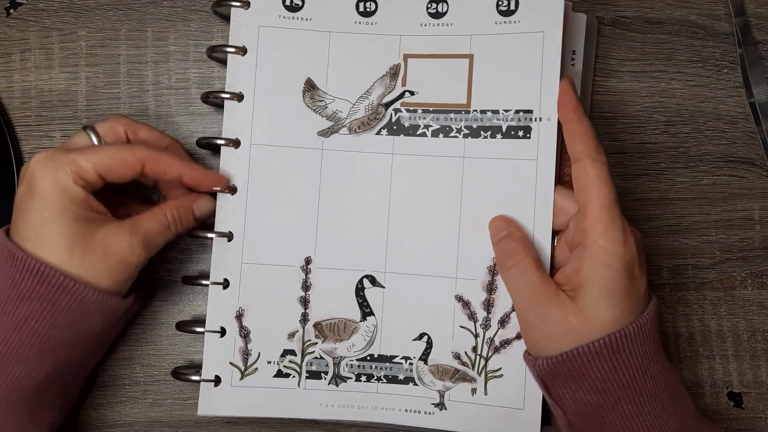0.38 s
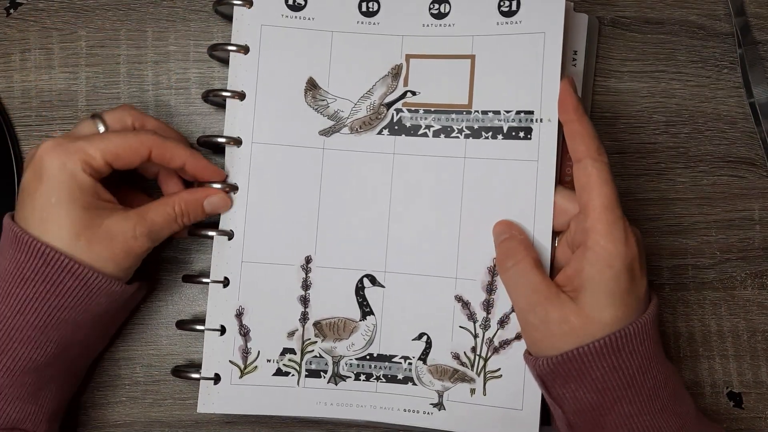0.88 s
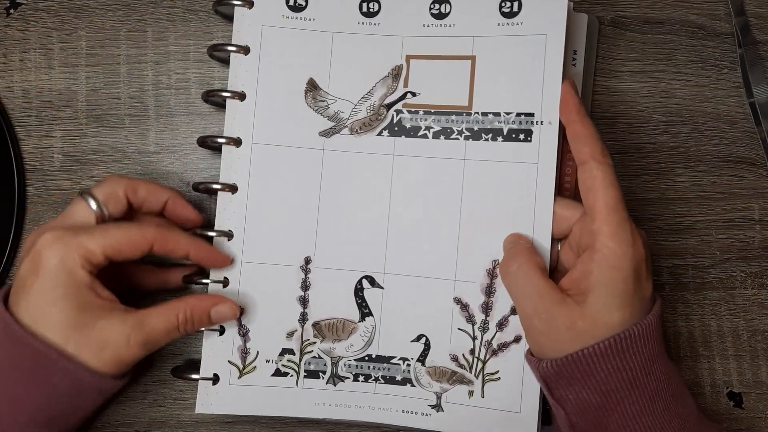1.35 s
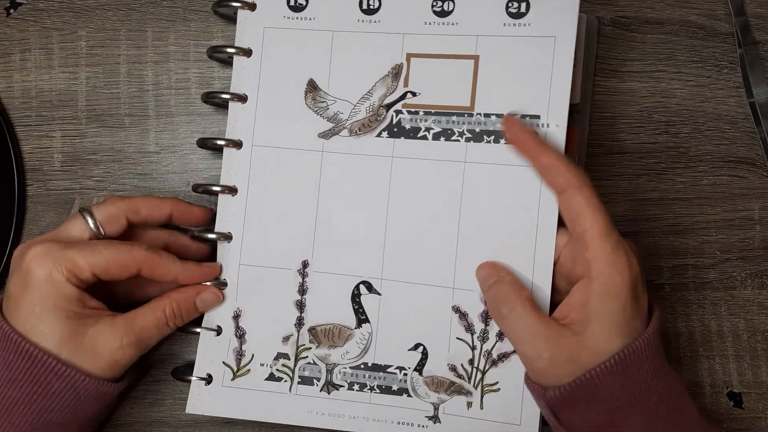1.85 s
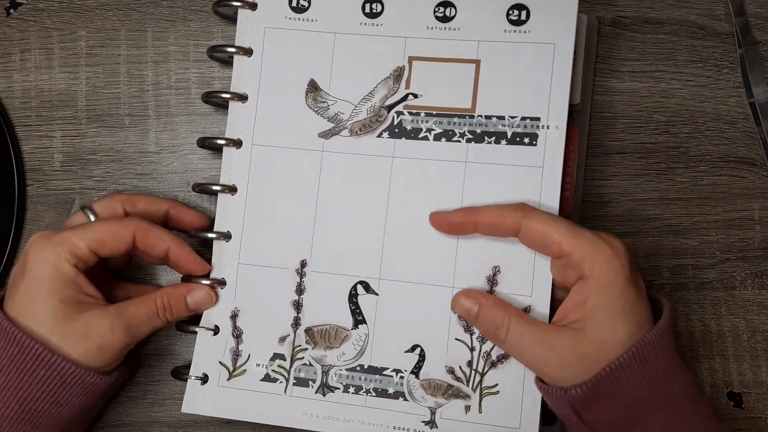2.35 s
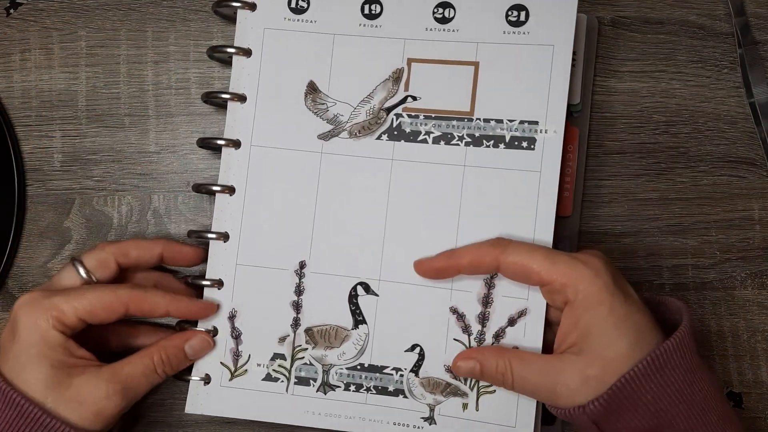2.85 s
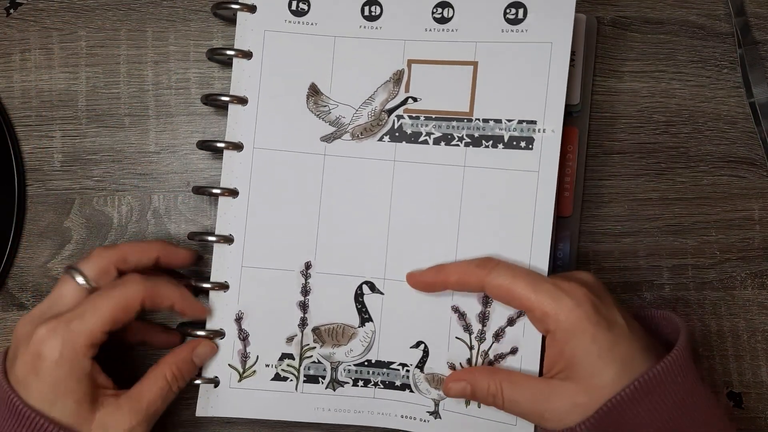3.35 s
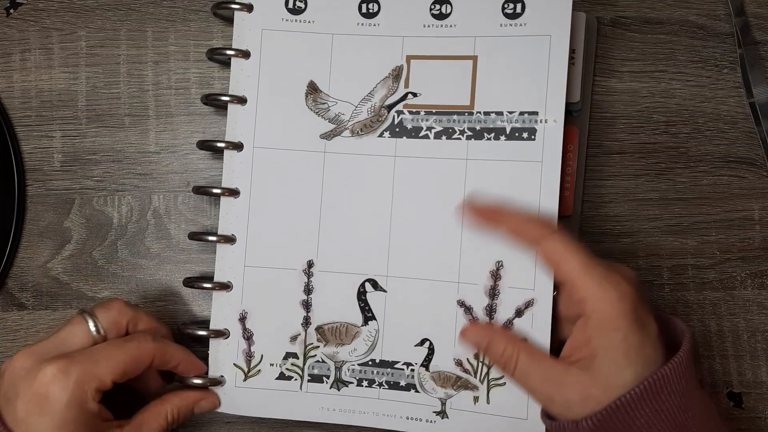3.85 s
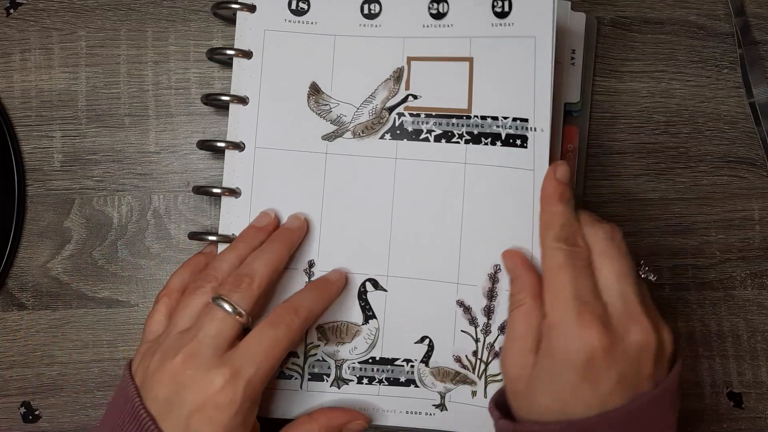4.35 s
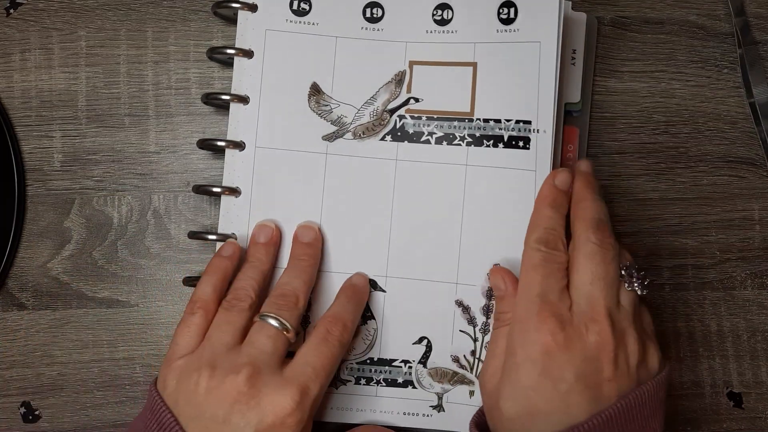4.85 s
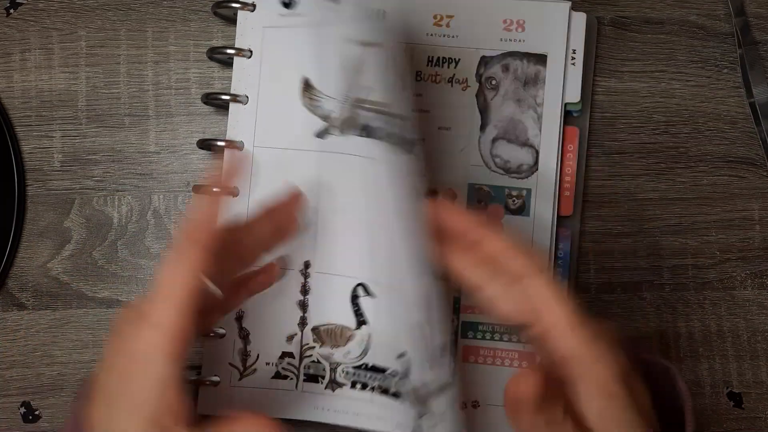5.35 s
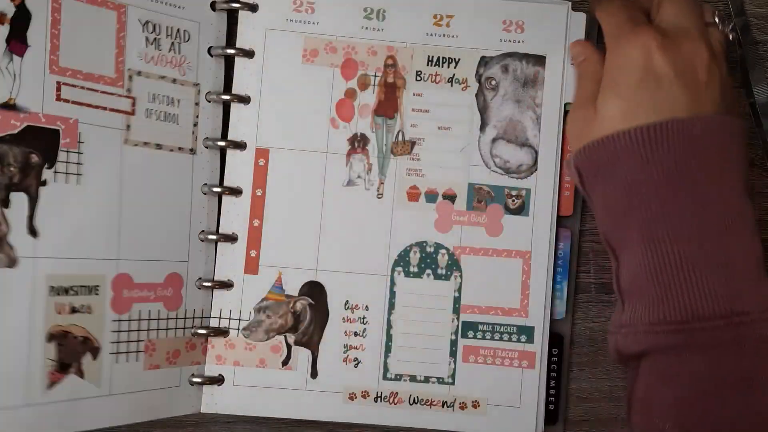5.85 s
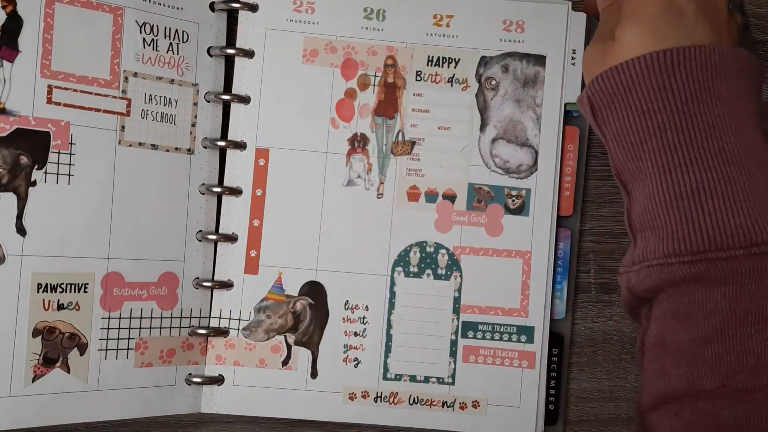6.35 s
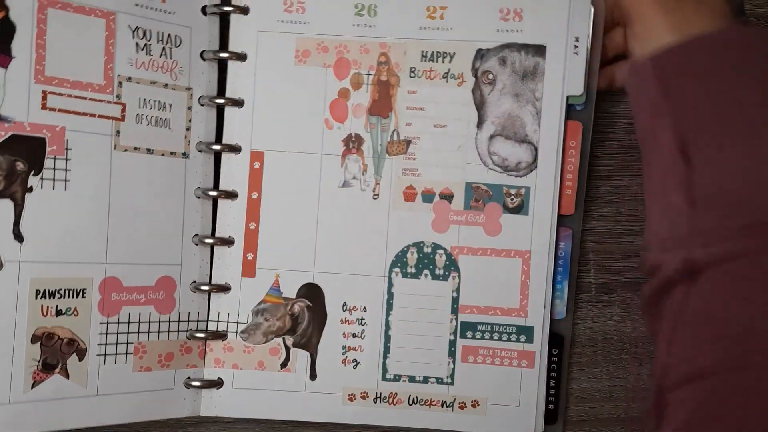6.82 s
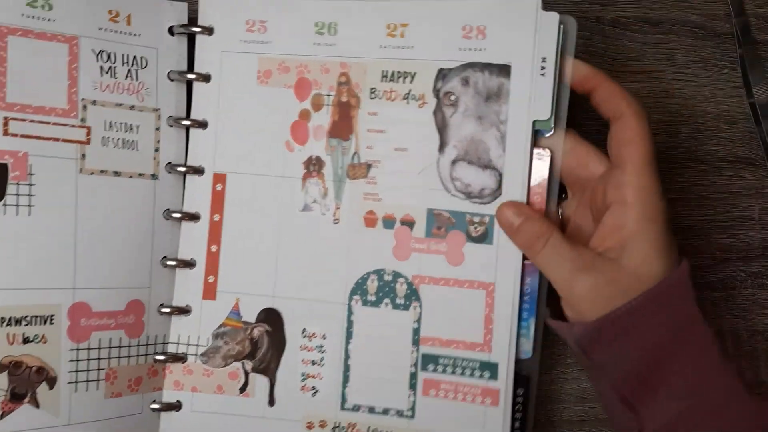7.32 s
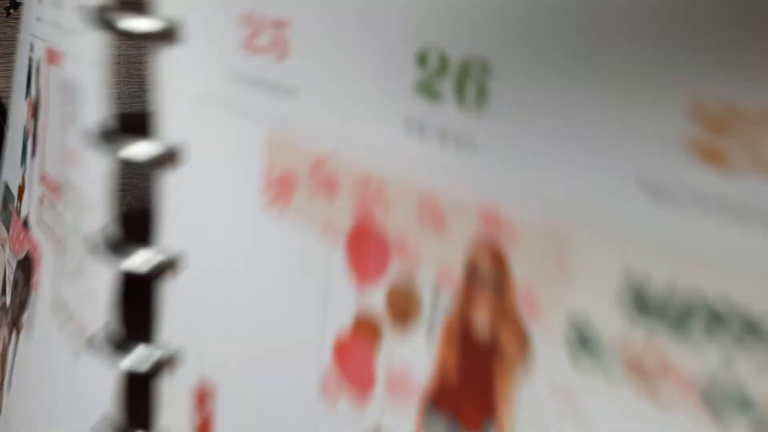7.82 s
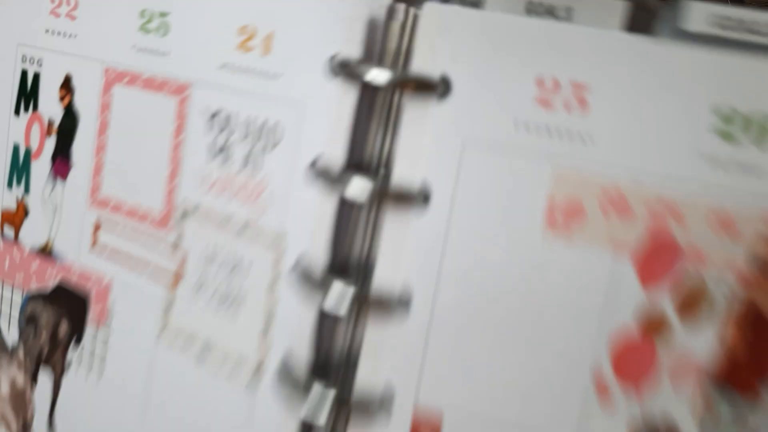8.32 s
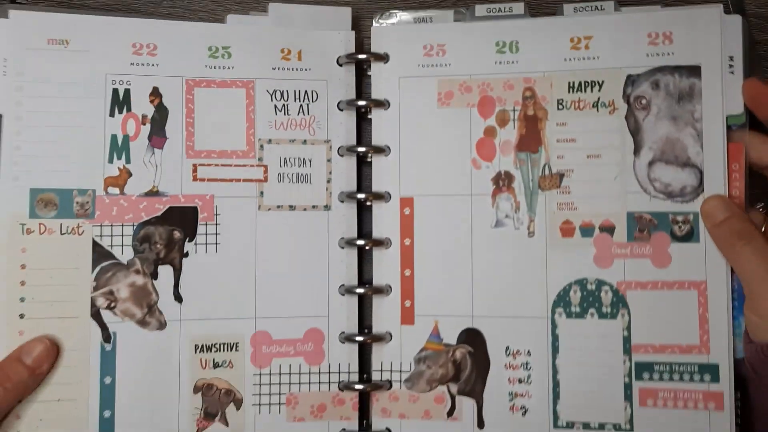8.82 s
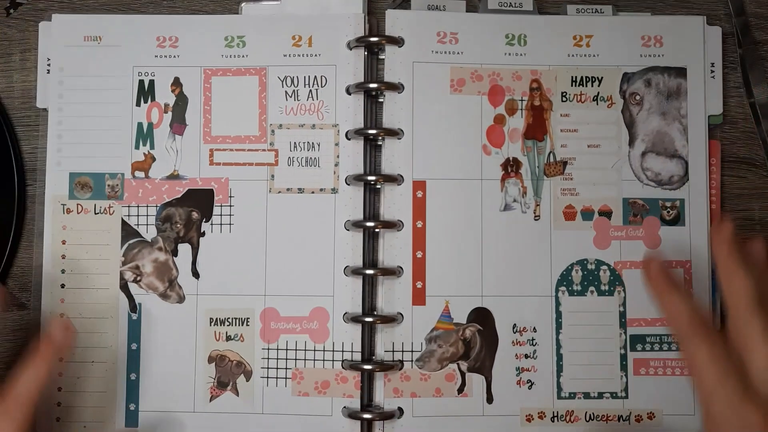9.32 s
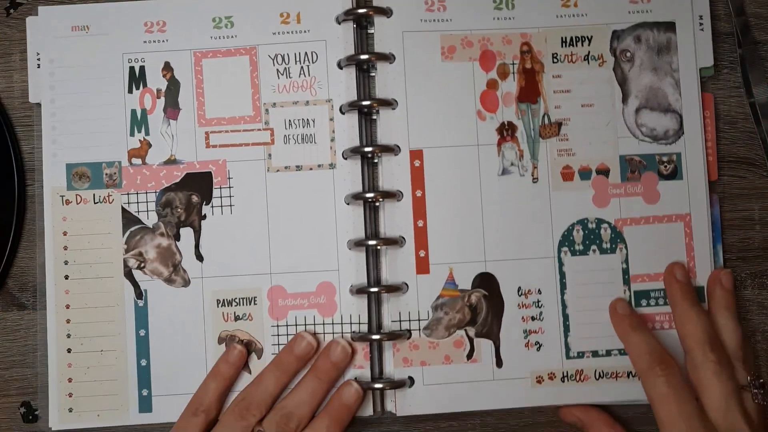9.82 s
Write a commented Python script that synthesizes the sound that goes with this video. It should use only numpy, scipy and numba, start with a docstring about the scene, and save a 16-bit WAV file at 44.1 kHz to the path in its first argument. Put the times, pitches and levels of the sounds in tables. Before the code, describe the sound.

A close microphone in a small room catches hands on a paper planner, over faint air hiss and unsteady low hum. At 0.15 s a papery knock and scuff, then small scrapes and faint finger rubs. Around 1.5 s a tight cluster of bright, hard clicks snaps out, the sharpest early sound. Sparse brushing and isolated ticks continue through 4 s; a tiny rising fingertip squeak comes at 4.25 s. Outside, an engine drones faintly, strongest near 5 s. At 5.1-5.3 s a page flips with a crisp swish, followed by soft bumps to 5.65 s. Near quiet until 6.5 s, then steady low rustling and clicking until 7.7 s. From 7.8 to 8.1 s lifting brings quick hard clacks and a barely audible fluttering whistle. At 8.5 s the book lands with the loudest thump and a low boom, shuffles, thuds again at 9.0 s, and a soft rub at 9.4 s fades to room tone.

```python
"""Handling a paper planner

Fingers work down the disc binding of a planner on a wooden desk; a page is flipped, the book is lifted and set down.
Rubbing skin and paper is grainy noise; clicks and knocks are fading bursts of ticks, and desk tones ring below.
Short scrapes swell and die, a fingertip squeaks once on sliding tones, and a faint whistle is a narrow fluttering band.
An engine drones by outside as a few low tones, over wavering house hum and steady air noise.
A small room answers the hands with fading noise echoes."""
import sys
import numpy as np
from scipy import signal
from scipy.fft import rfft, irfft
from scipy.io import wavfile
from scipy.ndimage import uniform_filter1d
from numba import njit

SR = 44100
rng = np.random.default_rng(int(sys.argv[2]) if len(sys.argv) > 2 else 0)


def log_audio(samples):
    """Write samples as a 16-bit WAV file to the path given in sys.argv[1]."""
    # one column per channel
    frames = np.atleast_2d(samples).T
    # limit to full scale, then quantise
    limited = np.clip(frames, -1, 1)
    pcm = np.round(limited * 32767).astype(np.int16)
    wavfile.write(sys.argv[1], SR, pcm)


def voltage_ratio(level):
    """Linear amplitude factor for a level in decibels (scalar or array-like)."""
    return 10 ** (np.asarray(level, float) / 20)


N = 438354
T = np.arange(N) / SR  # time in seconds
SIDES = np.array([[.5], [-.5]])  # left, right

# Colour of the room air and microphone hiss, relative levels: pitch_hz, level_db (per Hz)
AIR_COLOUR = [(25, -38.5), (45, -10), (75, -6.5), (170, -18.5), (300, -18.5), (450, -18.5), (700, -29.5),
              (1100, -29.5), (4000, -39), (9000, -39), (15700, -37.5)]
# Tones of the appliance hum, before they waver: pitch_hz, level_db
HUM_TONES = [(75.4, -75), (145.3, -74.5), (290.7, -86.5), (328.4, -84)]
# Engine outside, before the walls: time_s, firing_rate_hz, level_db
ENGINE_PATH = [(4.1, 48.98, -74.5), (5.06, 65.4, -61.5), (6.199, 68.9, -76.5)]
# What the house walls let through: pitch_hz, gain_db
WALL_GAIN = [(45, 0), (65, 6.5), (100, 0), (150, 5), (200, -3.5), (260, -20)]
# How long room echoes take to fade by 60 dB: pitch_hz, fade_s
ECHO_FADE = [(200, 0.22), (1000, 0.21), (4000, 0.21), (12000, 0.22)]
# Where the hands work: time_s, left_minus_right_db
HAND_PAN = [(0.0, -2.5), (1.96, -4.5), (9.94, -1)]
# Ringing tones of the desk under a knock, relative levels: pitch_hz, level_db, fade_s (to -60 dB)
DESK_TONES = [(130, -12.5, 0.09), (183, -12, .12), (319.6, 4, 0.061), (361, 0, 0.075), (442.5, -3, 0.11),
              (562, 2, 0.033), (751, -1.5, 0.032), (1024, -12, 0.022)]
# Booming tones of the desk top as a whole, relative levels: pitch_hz, level_db, fade_s (to -60 dB)
BOOM_TONES = [(64.3, -1, 0.38), (93, 7.5, 0.31), (116, -2, 0.49)]
# The whole book meets the desk: start_s, level_db, push_ms (from start to strongest push)
BOOK_LANDINGS = [(8.492, -46.5, 14), (8.982, -46.5, 13.4)]
# Colour of the paper body in a burst, relative levels: pitch_hz, level_db (per Hz)
BODY_COLOUR = [(400, -7.5), (900, -5), (2000, -5), (4200, -8), (5500, -16), (8000, -29.5)]
# Colour of rubbed paper, relative levels: pitch_hz, level_db (per Hz)
RUSTLE_COLOUR = [(400, -9), (900, -6.5), (1800, -6), (2600, -7.5), (4500, -9.5), (7000, -32)]
# Colour of the crisp top and the hiss, relative levels: pitch_hz, level_db (per Hz)
CRISP_COLOUR = [(2200, -17), (4600, -0.5), (6900, -1), (8600, -5), (12500, 0.5), (15700, -1)]
# Thin whistle while the book is lifted: time_s, pitch_hz, level_db
WHISTLE_PATH = [(8.14, 2150, -69), (8.3, 2130, -77), (8.41, 2110, -73.5), (8.46, 2100, -79)]
# Fingertip squeak, before it wavers: time_s, slip_rate_hz, level_db
SQUEAK_PATH = [(4.18, 330, -84), (4.225, 610, -67), (4.254, 820, -54), (4.275, 790, -66), (4.35, 760, -84)]
# Short scrapes: start_s, body_db, crisp_db (relative to body), pitch_hz (of body), length_ms
SCRAPE_EVENTS = [(0.2863, -54, -1, 2450, 36), (0.495, -59, -9, 2110, 20), (0.579, -47.5, 1.5, 2200, 27),
                 (1.466, -52.5, -15.5, 2040, 36), (1.871, -62, 3, 1160, 100), (2.478, -60, -2.5, 1740, 61),
                 (2.5074, -54, -4.5, 1730, 45), (3.1428, -54.5, 4, 4000, 34),
                 (5.1887, -41.5, 4.5, 2110, 21), (7.2514, -43.5, -5, 1150, 15.4),
                 (7.311, -50, -20, 1550, 30), (7.605, -59, 7, 3120, 30)]
# Strokes of skin and pages: full_strength_s, hold_s, rustle_db, hiss_db, pitch_hz (of rustle)
STROKE_EVENTS = [(0.0, 0.07, -82, -69, 2877), (0.115, 0.032, -76.5, -60.5, 1160),
                 (0.158, 0.022, -48, -47, 900), (0.18, .01, -63, -71, 1940),
                 (0.508, 0.044, -67, -63.5, 2135), (0.583, .11, -68.5, -63.5, 2390),
                 (0.755, 0.059, -86, -71.5, 1770), (0.876, 0.029, -76, -63, 1674),
                 (1.039, 0.11, -80, -68, 1717), (1.166, 0.05, -72.5, -61.5, 1706),
                 (1.287, 0.051, -76, -66, 1914), (1.455, 0.12, -68, -57.5, 1998),
                 (1.571, 0.031, -57.5, -55, 1870), (1.724, .1, -71, -67.5, 3444),
                 (1.874, 0.038, -62, -59.5, 1750), (1.968, 0.11, -71.5, -64.5, 1740),
                 (2.147, 0.15, -84.5, -74.5, 1444), (2.36, 0.098, -79.5, -67, 1435),
                 (2.483, 0.07, -68, -69.5, 1696), (2.594, 0.086, -74, -73.5, 1758),
                 (2.686, 0.046, -65, -62.5, 1130), (2.757, 0.08, -75.5, -67.5, 1640),
                 (2.912, 0.076, -73.5, -66.5, 1623), (3.028, 0.12, -64.5, -61, 1816),
                 (3.323, 0.04, -72, -62.5, 1580), (3.411, 0.045, -69, -68, 2953),
                 (3.524, 0.092, -74.5, -60, 1862), (3.602, 0.12, -81, -60.5, 1900),
                 (3.9, 0.11, -77, -63.5, 1970), (4.061, 0.0083, -66, -61, 1823),
                 (4.146, 0.026, -75, -65.5, 1780), (4.4, 0.025, -67.5, -68.5, 1408),
                 (4.79, 0.0051, -65.5, -67, 2019), (4.914, 0.0038, -75.5, -58.5, 2010),
                 (4.999, 0.032, -68.5, -59.5, 2527), (5.089, 0.023, -61, -57, 2580),
                 (5.144, 0.041, -54, -55, 1880), (5.186, 0.052, -47, -52.5, 1101),
                 (5.296, 0.041, -70, -71, 871), (5.38, 0.025, -71, -65.5, 1500),
                 (5.521, 0.03, -66.5, -62.5, 860), (5.627, .04, -66, -66, 915),
                 (5.735, 0.11, -86, -77.5, 2028), (6.548, 0.043, -72, -66, 988),
                 (6.584, 0.03, -62, -67.5, 1028), (6.651, 0.074, -70.5, -68, 942),
                 (6.751, 0.074, -61, -56.5, 900), (6.846, 0.099, -55.5, -55.5, 864),
                 (6.966, 0.086, -55, -56.5, 892), (7.082, 0.072, -56, -56, 800),
                 (7.197, 0.082, -55.5, -56, 1072), (7.298, 0.038, -58, -61, 800),
                 (7.395, 0.075, -60, -58.5, 1300), (7.489, 0.078, -59.5, -59, 1168),
                 (7.615, 0.045, -55.5, -54.5, 3144), (7.687, 0.16, -61.5, -63.5, 1912),
                 (7.772, 0.0075, -74, -53, 3000), (7.865, 0.06, -72, -65.5, 3357),
                 (7.958, 0.041, -61.5, -75, 2325), (8.071, 0.033, -64, -58, 996),
                 (8.159, 0.078, -70.5, -71.5, 2004), (8.293, .07, -66, -77, 800),
                 (8.506, 0.072, -38, -61, 3000), (8.601, 0.074, -52, -59, 1883),
                 (8.659, 0.068, -54.5, -68, 1500), (8.781, 0.076, -58, -72, 955),
                 (8.857, .02, -59, -67, 817), (8.881, 0.021, -48.5, -59.5, 988),
                 (8.929, 0.049, -42.5, -52.5, 1002), (9.001, 0.033, -41, -70, 872),
                 (9.161, 0.36, -75.5, -76, 848), (9.401, 0.026, -63.5, -70, 1395),
                 (9.433, 0.081, -55, -61, 1425), (9.564, 0.14, -69, -79.5, 1541)]
# The book flexes on the desk: full_strength_s, hold_s, level_db
FLEX_EVENTS = [(0.175, 0.015, -60), (4.388, 0.022, -66.5), (5.237, 0.023, -45.5), (5.521, 0.09, -56.5),
               (5.637, .02, -48.5), (6.545, .02, -72.5), (6.842, 0.01, -50), (6.982, 0.19, -64),
               (7.46, 0.18, -59), (7.62, 0.48, -70.5), (8.064, 0.067, -59.5), (8.293, 0.063, -69.5),
               (8.51, 0.0073, -36), (8.751, 0.18, -67), (8.859, 0.12, -56), (8.97, 0.03, -53),
               (9.417, 0.081, -53.5)]
# Discs and page edges click: start_s, body_db, crisp_db (relative to body), pitch_hz, fade_ms (to -20 dB)
CLICK_EVENTS = [(0.3144, -39, -7, 2200, 6.7), (0.6513, -53.5, -26, 2750, 12),
                (1.52, -30.5, -7.5, 1500, 5.6), (1.5247, -24.5, -8, 3530, 4.2),
                (1.5566, -18.5, -8.5, 3420, 4.5), (1.565, -33.5, -10.5, 1360, 12),
                (1.8899, -37.5, -3.5, 1380, 5.8), (2.3078, -63, -11, 1500, 8.1),
                (2.690, -38.5, -3, 1190, 21.4), (2.916, -56, 4.5, 1700, 4.6), (3.006, -70, 21, 1680, 33),
                (3.151, -57, 10, 4500, 2.6), (3.3167, -57.5, 2.5, 1170, 16),
                (3.3864, -34.5, -1.5, 1410, 6.6), (4.778, -40.5, 6, 4530, 3.4),
                (5.126, -37, -16, 1580, 5.5), (6.8242, -30.5, -26, 740, 14), (7.016, -40, -17, 750, 24),
                (7.0903, -41, -7, 785, 64), (7.128, -39, -11, 890, 9.4), (7.213, -45, -7.5, 1200, 8.2),
                (7.303, -42, -11.5, 700, 13), (7.3875, -42.5, -8.5, 1500, 9.3),
                (7.6184, -44.5, -2, 2500, 13.6), (7.8266, -33, -5.5, 3500, 4.7),
                (7.92, -31, -10, 1300, 2.5), (7.9545, -23, -7.5, 1980, 5.7),
                (7.9715, -26.5, -7.5, 940, 5.6), (7.9821, -28.5, -11, 1040, 4.5),
                (8.0659, -23, -10, 1150, 9.3), (8.1077, -37.5, -8, 985, 14),
                (8.4746, -11.5, -26.5, 3380, 12.8), (8.63, -29, -4, 2000, 7.5),
                (8.761, -40, -14, 1030, 6.6), (8.976, -44, 13.5, 3000, 3.8)]
# Pages knock on the desk: start_s, body_db, thud_db and crisp_db (relative to body), fade_ms (to -20 dB)
KNOCK_EVENTS = [(0.1451, -40, -17, -12, 43), (0.156, -25.5, -12.5, -3.5, 10),
                (0.2035, -34.5, -10.5, 1.5, 6.2), (2.3082, -62.5, 4, -29, 45), (4.3936, -51, 1.5, -2, 9.7),
                (5.2228, -37, -8, -16, 7.3), (5.2631, -45.5, 10.5, -14, 2.6),
                (5.5055, -53.5, 17.5, -0.5, 8.6), (5.6361, -53.5, 11, -4, 20),
                (5.6528, -53.5, 10.5, -15.5, 18), (6.7172, -51, -13, -24, 19), (6.8234, -45, 10.5, -19, 25),
                (7.392, -54, 6.5, -25, 38), (7.4656, -36.5, -6, -3, 19), (7.499, -38.5, -4.5, -1, 7.3),
                (8.0106, -31, -4, -14.5, 6.3), (8.0493, -25, -2.5, -10.5, 17), (8.478, -21, -5, -32, 66),
                (8.989, -17, -7, -37, 13.5), (9.022, -43.5, 6, 7, 13), (9.034, -22, -2.5, -17, 7.5)]


def unit(x):
    """Scale to an average strength (rms) of 1."""
    return x / np.sqrt(np.mean(x ** 2))


def shape(points, size=1024):
    """Build a filter with the colour of (Hz, dB) points and energy 1; it responds only after its input."""
    hz, db = np.transpose(points)
    bin_hz = np.arange(size + 1) * SR / 2 / size
    log_gain = np.interp(np.log(bin_hz + 1), np.log(hz), db) * np.log(10) / 20
    # folding the second half onto the first makes the filter minimum-phase
    fold = irfft(log_gain)
    fold[1:size] *= 2
    fold[size + 1:] = 0
    response = irfft(np.exp(rfft(fold)))[:size]
    return response / np.sqrt(np.sum(response ** 2))


def through(x, response):
    """Pass a sound through a filter by convolving along time."""
    return signal.oaconvolve(np.atleast_2d(x), np.atleast_2d(response), axes=1)[:, :N]


def gain(s, db):
    """Turn a dB curve into a gain, practically silent outside it."""
    return voltage_ratio(np.interp(T, s, db, left=-150, right=-150))


def walk(rate):
    """Smooth random drift that turns about rate times a second, with spread 1."""
    steps = np.repeat(rng.standard_normal(int(N / SR * rate) + 2), 8)
    coarse = uniform_filter1d(uniform_filter1d(steps, 8), 8)
    return np.interp(T * rate * 8, np.arange(len(coarse)), unit(coarse))


def pair(alike, grain_db=0.):
    """Noise for two channels, partly shared; grain makes a few samples stand out as ticks."""
    mid, side = rng.standard_normal((2, N))
    ticks = voltage_ratio(grain_db * rng.exponential(size=N))
    return unit(ticks * (np.sqrt(1 + alike) * mid + np.sqrt(1 - alike) * 2 * SIDES * side))


@njit
def svf(x, g, sharp):
    """Band-pass whose centre, given as tan(pi Hz / SR), moves every sample; gain 1 at the centre."""
    y = np.empty_like(x)
    for c in range(x.shape[0]):
        band, low = 0., 0.
        for i in range(x.shape[1]):
            v = (band + g[i] * (x[c, i] - low)) / (1 + g[i] * (g[i] + 1 / sharp))
            band = 2 * v - band
            low = low + 2 * g[i] * v
            y[c, i] = v / sharp
    return y


def ring(modes):
    """Response of several fading tones to one knock, energy 1."""
    t = T[:SR // 3]
    out = np.zeros(len(t))
    for k, (hz, db, fade_s) in enumerate(modes):
        out += (-1) ** k * voltage_ratio(db) * np.sin(2 * np.pi * hz * t) * 1000 ** (-t / fade_s)
    return out / np.sqrt(np.sum(out ** 2))


def bursts(rows, form, sharp):
    """Bursts of paper body and crisp top; the bent sheet favours its own pitch."""
    push, t = np.zeros((2, N + SR)), T[:SR // 3]
    for s, db, *_, crisp_db, _, ms in rows:
        start = int(s * SR)
        levels = voltage_ratio(db + np.array([[-3], [crisp_db + 0.5]]))
        push[:, start:start + len(t)] += levels * form(t, max(ms, 1) / 1000)
    rows = np.array(rows)
    # the pitch is that of the latest burst
    latest = np.clip(np.searchsorted(rows[:, 0], T) - 1, 0, None)
    hz = rows[latest, -2]
    body, crisp = pair(.25, 2.0), pair(.3, 2.7)
    body = through(push[0, :N] * body, shape(BODY_COLOUR))
    pitched = svf(body, np.tan(np.pi * hz / SR), sharp)
    body = voltage_ratio(-8.5) * body + voltage_ratio(2.5) * pitched
    return body + through(push[1, :N] * crisp, shape(CRISP_COLOUR))


def swells(s, hold, rise_db_s, fall_db_s):
    """dB of each gesture every ms: a rise that is steepest at first contact, hold at 0, steady fall."""
    contact_s = 0.015  # the rise is twice as quick, on average, from this far ahead
    t = T[::SR // 1000]
    early = np.maximum(s[:, None] - t, 0)
    rise = -early * rise_db_s * (1 + early / contact_s)
    fall = ((s + hold)[:, None] - t) * fall_db_s
    return np.minimum(0, np.minimum(rise, fall))


def summed(form_db, db):
    """Gain of all gestures together; their powers add."""
    power = np.sum(voltage_ratio(2 * (form_db + db[:, None])), axis=0)
    return np.interp(T, T[::SR // 1000], np.sqrt(power))


def house():
    """Unsteady appliance hum over room air and microphone hiss; only the bass is shared by both channels."""
    phase = 2 * np.pi * np.cumsum(1 + 0.0051 * walk(30)) / SR
    hum = sum(voltage_ratio(db + 5.7 * walk(22)) * np.sin(hz * phase) for hz, db in HUM_TONES)
    low = signal.butter(1, 400, fs=SR, output="sos")
    shared, own = pair(1), pair(0)
    air = signal.sosfilt(low, shared) + own - 0.12 * signal.sosfilt(low, own)
    air = unit(through(air, shape(AIR_COLOUR, size=4096)))
    return hum + voltage_ratio(-71.5) * air


def engine():
    """Only the lowest firing orders come through the walls, each swelling and breaking up on its own."""
    s, hz, db = np.transpose(ENGINE_PATH)
    hz = np.interp(T, s, hz) * (1 + .02 * walk(14))
    phase = 2 * np.pi * np.cumsum(hz) / SR
    tones = np.zeros(N)
    for k in range(1, 5):
        wall_db = np.interp(k * hz, *np.transpose(WALL_GAIN))
        tones += voltage_ratio(wall_db + 3.2 * walk(22)) * np.sin(k * phase)
    return gain(s, db) * tones


def room(x):
    """Diffuse echoes after a short gap, each octave fading at its own rate; bass reaches both channels alike."""
    t, (centre, fade_s) = T[:SR // 3], np.transpose(ECHO_FADE)
    tail = 0
    for hz in 125 * 2. ** np.arange(7):
        mid, side = rng.standard_normal((2, len(t)))
        noise = mid + min(hz / 900, 1) * 2 * SIDES * side
        # the top band reaches a little higher than an octave
        edges = [hz / np.sqrt(2), hz * np.sqrt(2) * (1.4 if hz > 7000 else 1)]
        band = signal.sosfilt(signal.butter(2, edges, "band", fs=SR, output="sos"), noise)
        fade = 1000 ** (-t / np.interp(np.log(hz), np.log(centre), fade_s))
        tail = tail + unit(band) * np.sqrt(hz) * fade
    tail = tail * np.clip((t - .003) / 0.0019, 0, 1)  # 3 ms gap, then a quick rise
    return voltage_ratio(-8.5) * through(x, tail / np.sqrt(np.sum(tail ** 2) / 2))


def landings():
    """A soft, broad push from the whole book sets the desk top booming."""
    push = sum(voltage_ratio(db) * np.exp(-((T - s) * 1000 / ms - 1) ** 2 * 8) for s, db, ms in BOOK_LANDINGS)
    return through(push, ring(BOOM_TONES))


def whistle():
    """A sliding tone times a quick random drift gives a narrow fluttering band."""
    s, hz, db = np.transpose(WHISTLE_PATH)
    tone = np.sin(2 * np.pi * np.cumsum(np.interp(T, s, hz)) / SR)
    return unit(walk(360) * tone) * gain(s, db)


def squeak():
    """Skin sticks and slips unevenly, speeding up and then easing; the octave is the loudest part."""
    s, hz, db = np.transpose(SQUEAK_PATH)
    phase = 2 * np.pi * np.cumsum(np.interp(T, s, hz) * (1 + .07 * walk(260))) / SR
    tone = voltage_ratio(-7) * np.sin(phase) + np.sin(2 * phase)
    tone += voltage_ratio(-13.5) * np.sin(3 * phase / 2) + voltage_ratio(-25) * np.sin(3 * phase)
    return unit(tone) * gain(s, db) * voltage_ratio(2.8 * walk(150))


def scrapes():
    """A nail or page edge drags for a moment: no blow, a rounded swell."""
    def swell(t, length):
        return np.sin(np.pi * np.minimum(t / length, 1) ** 0.47) ** 2
    return bursts(SCRAPE_EVENTS, swell, 5.7)


def hits():
    """Each snap is a sudden, fading burst of ticks; it also gives the desk a push and a rattle."""
    click_thud_db, knock_hz = -33.5, 1200  # clicks hardly move the desk; knocks share one pitch
    clicks = [(s, db, click_thud_db, crisp_db, hz, ms) for s, db, crisp_db, hz, ms in CLICK_EVENTS]
    knocks = [(s, db, thud_db, crisp_db, knock_hz, ms) for s, db, thud_db, crisp_db, ms in KNOCK_EVENTS]
    rows = sorted(clicks + knocks)
    push, t = np.zeros((2, N + SR)), T[:SR // 3]
    soft = voltage_ratio(-4) * np.exp(-t / .0007)
    for s, db, thud_db, _, _, fade_ms in rows:
        start = int(s * SR)
        rattle = 1000 ** (-t * 1000 / (3 * max(fade_ms, 1)))
        push[:, start:start + len(t)] += voltage_ratio(db + thud_db) * np.array([soft, rattle])
    thud = through(push[0, :N] + push[1, :N] * pair(.9), ring(DESK_TONES))

    def snap(t, fade):
        rise = 1 - np.exp(-t / 0.0008)
        crack = 1 + np.exp(-t / .0015)  # the first ticks are the hardest
        return rise * 1000 ** (-t / (3 * fade)) * crack
    return thud + bursts(rows, snap, 2.18)


def rubbing():
    """Friction of skin on paper, each stroke with its own pitch; parts of the spectrum flicker on their own."""
    s, hold, rustle_db, hiss_db, hz = np.transpose(STROKE_EVENTS)
    form_db = swells(s, hold, rise_db_s=349.5, fall_db_s=233)
    rustle_gain, hiss_gain = summed(form_db, rustle_db), summed(form_db, hiss_db)
    loudest = np.repeat(np.argmax(form_db + rustle_db[:, None], axis=0), SR // 1000)[:N]

    # pages worked hard buckle in small sudden creases of a few ms
    creases = (rng.random(N) < 70 / SR) * np.minimum(rng.exponential(size=N), 1.2)
    creases = creases * np.clip(rustle_gain * voltage_ratio(60), 0, 1)
    catch = walk(50) + 5 * signal.lfilter([1], [1, -np.exp(-1 / (.006 * SR))], creases)

    rustle, hiss = pair(.4, 1.6), pair(.2, 1.2)
    rustle = through(rustle, shape(RUSTLE_COLOUR))
    # each stroke's pitch wavers
    pitch_hz = uniform_filter1d(hz[loudest], size=SR // 250) * 2 ** (.1 * walk(40))
    centre = np.tan(np.pi * pitch_hz / SR)
    voiced = unit(svf(svf(rustle, centre, 2.4), centre, 2.4) * voltage_ratio(4.5 * walk(35)))
    broad = unit(svf(rustle, centre, .75) * voltage_ratio(4 * walk(40)))
    share = np.clip(rustle_gain * voltage_ratio(58), .55, .9)  # a light touch favours its pitch, a heavy one is broad
    rustle = (np.sqrt(share) * broad + np.sqrt(1 - share) * voiced) * voltage_ratio(0.32 * catch)

    # each crease also rings for a moment at a wandering pitch
    crinkle = svf(through(creases * pair(.4), np.hanning(90)), centre * 2 ** (.7 * walk(40)), 4.0)
    crinkle = crinkle / np.std(crinkle[:, creases > 0])
    rustle = (rustle + voltage_ratio(-20) * crinkle) * rustle_gain

    hiss = through(hiss, shape(CRISP_COLOUR))
    dull = signal.sosfilt(signal.butter(2, 8000, fs=SR, output="sos"), hiss)
    bright = hiss - dull
    hiss = dull * voltage_ratio(1.0 * walk(54)) + bright * voltage_ratio(0.5 * walk(13))
    hiss = hiss * hiss_gain * voltage_ratio(1.0 * catch)

    # the flexing book stirs the desk tones
    s, hold, db = np.transpose(FLEX_EVENTS)
    flex_gain = summed(swells(s, hold, rise_db_s=247, fall_db_s=172.5), db)
    bend = through(pair(.7, 1.6), ring(DESK_TONES)) * flex_gain * voltage_ratio(2.5 * walk(30))
    return rustle + hiss + bend


def scene():
    """Hands and book close by, with the room behind them and the house around."""
    knocks = hits() + squeak()
    drags = scrapes()
    pan = voltage_ratio(np.interp(T, *np.transpose(HAND_PAN)) * SIDES)
    near = (knocks + drags + rubbing() + whistle()) * pan
    return near + room(knocks + 0.32 * drags) + landings() + engine() + house()


def band_limit(x):
    """A steep low-pass at the top of the band."""
    return signal.sosfilt(signal.butter(12, 16820, fs=SR, output="sos"), x)


def record(dry):
    """The microphone drops the deepest bass and the recorder cuts the top."""
    dry = signal.sosfilt(signal.butter(4, 42, "high", fs=SR, output="sos"), dry)
    mix = signal.sosfilt(signal.ellip(6, .2, 35, 15900, fs=SR, output="sos"), dry)
    return band_limit(mix)


dry = scene()
out = record(dry)
log_audio(out)
```